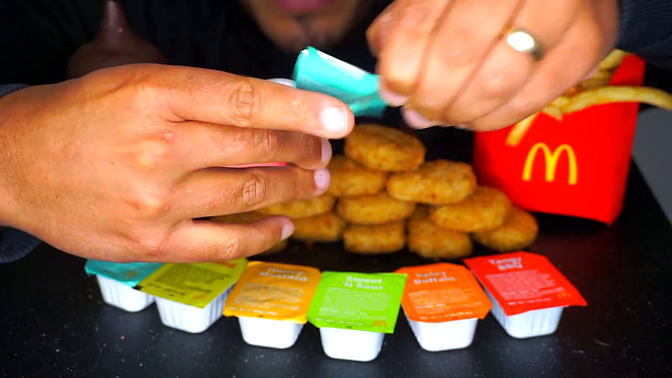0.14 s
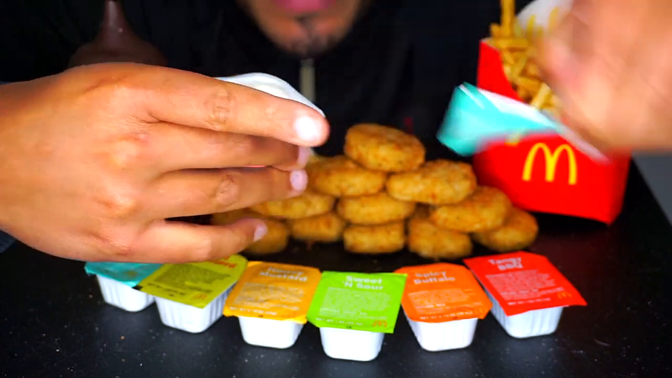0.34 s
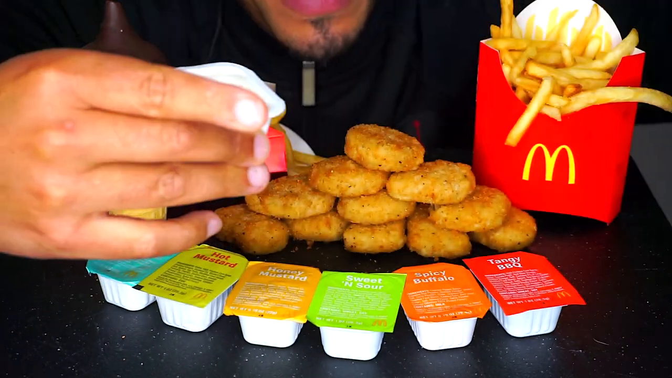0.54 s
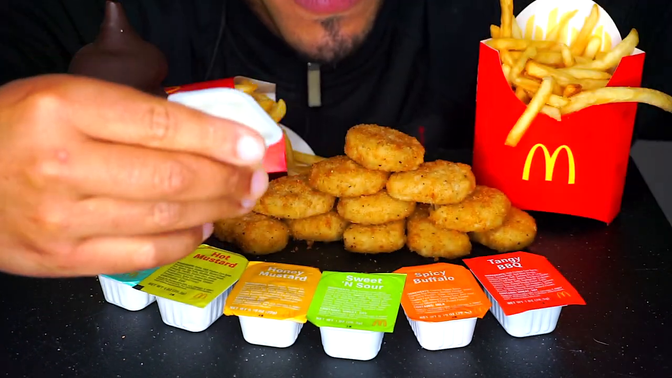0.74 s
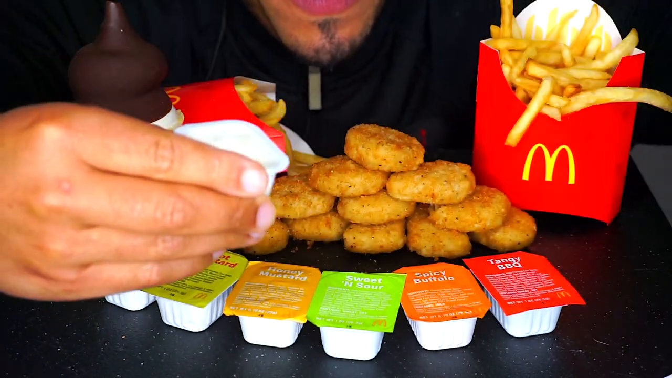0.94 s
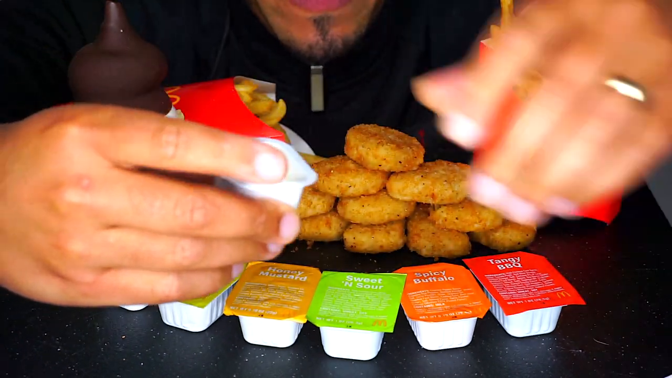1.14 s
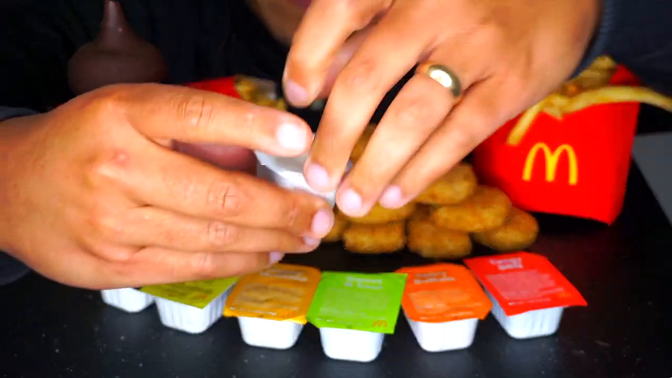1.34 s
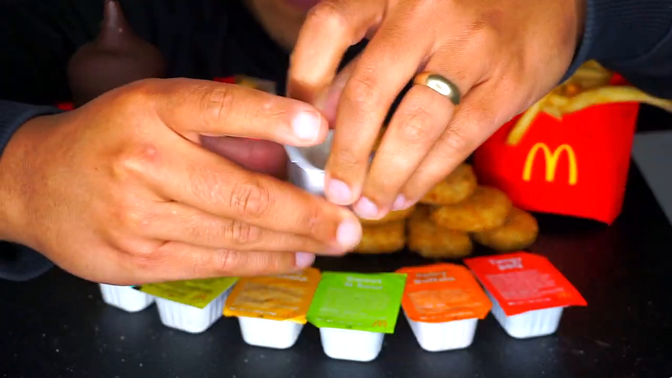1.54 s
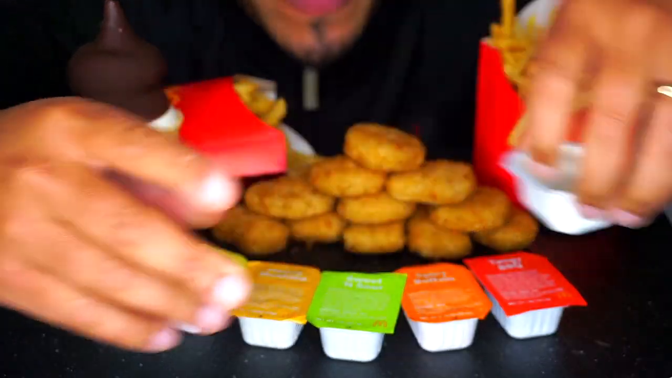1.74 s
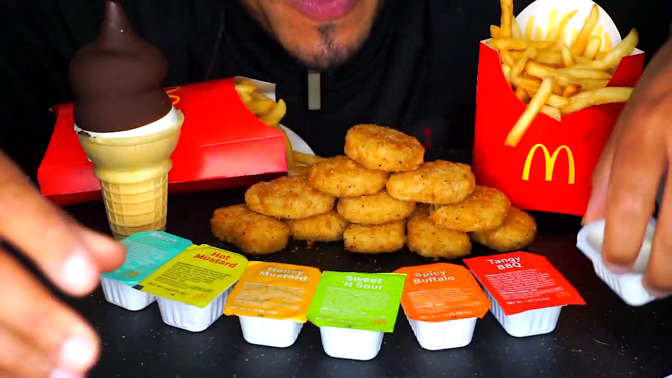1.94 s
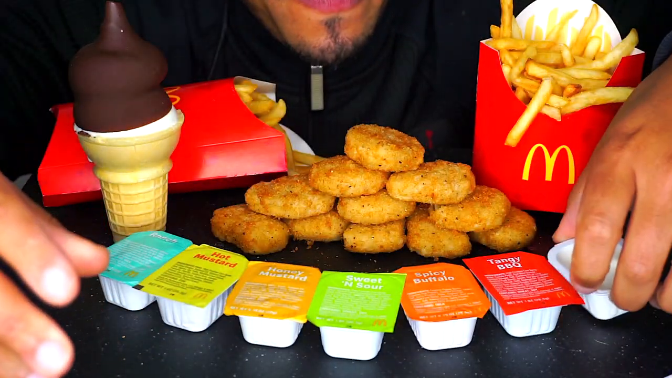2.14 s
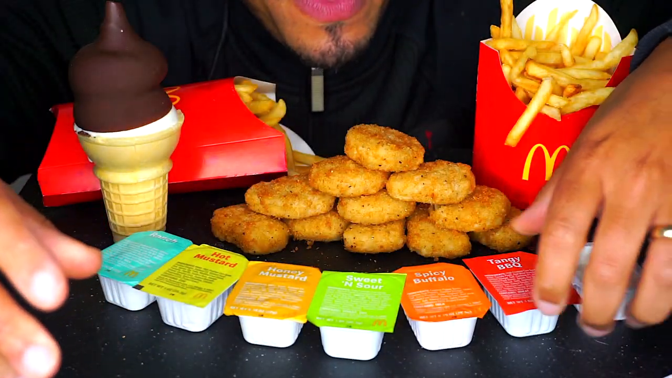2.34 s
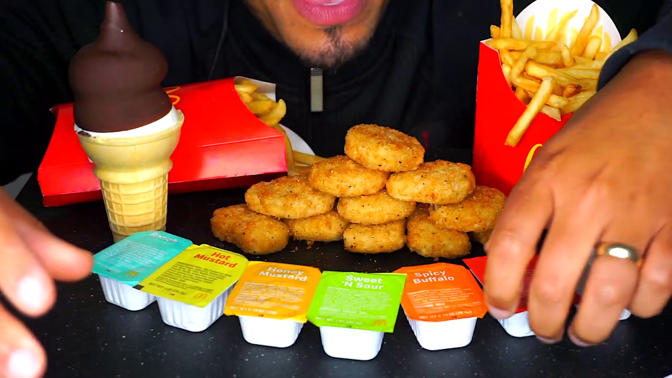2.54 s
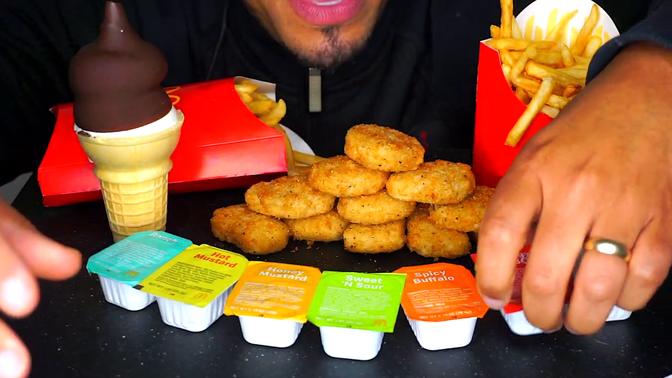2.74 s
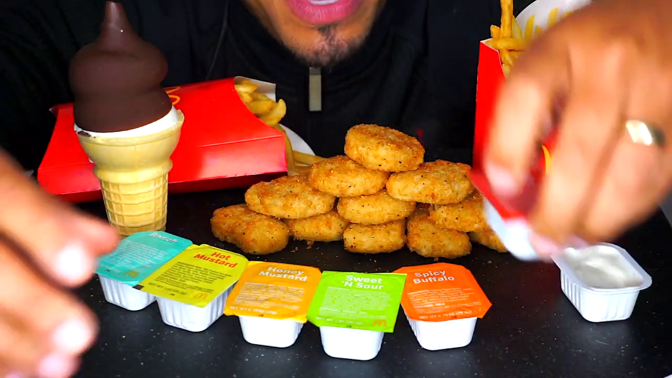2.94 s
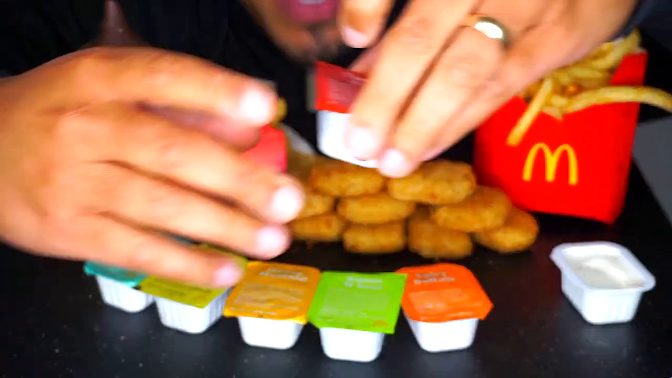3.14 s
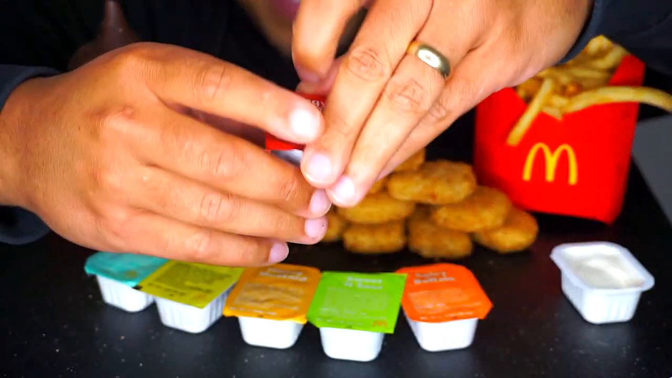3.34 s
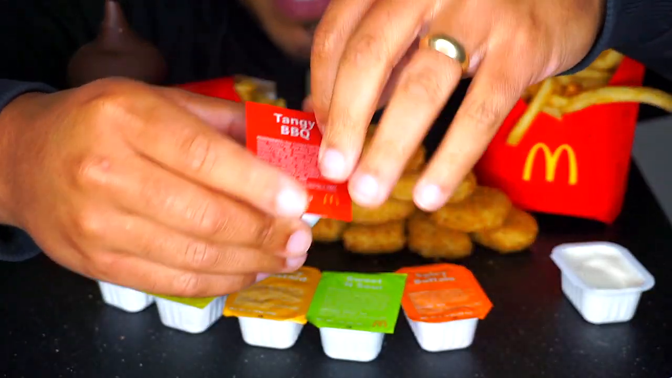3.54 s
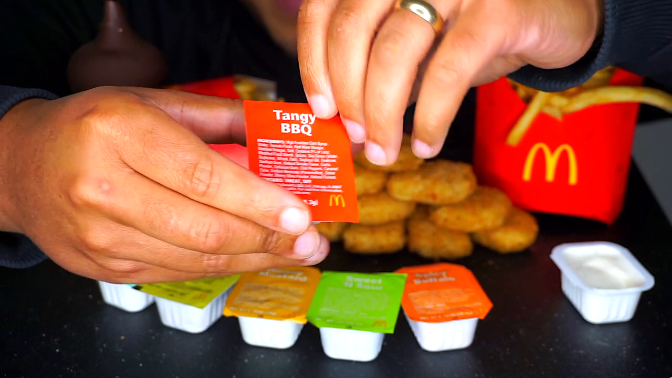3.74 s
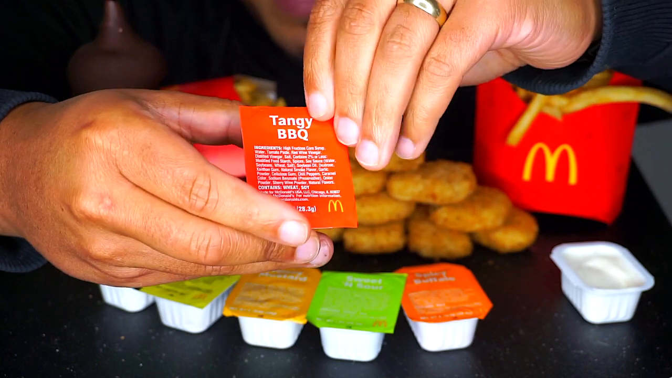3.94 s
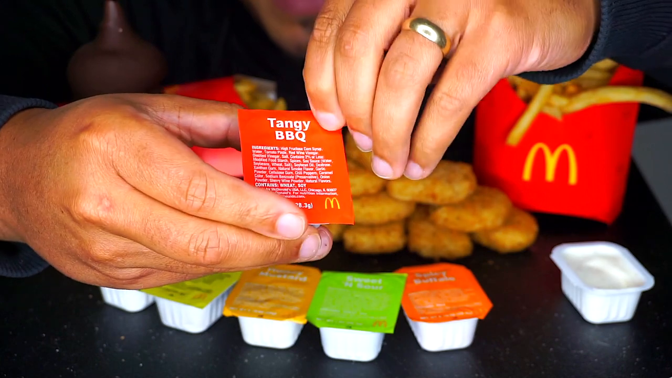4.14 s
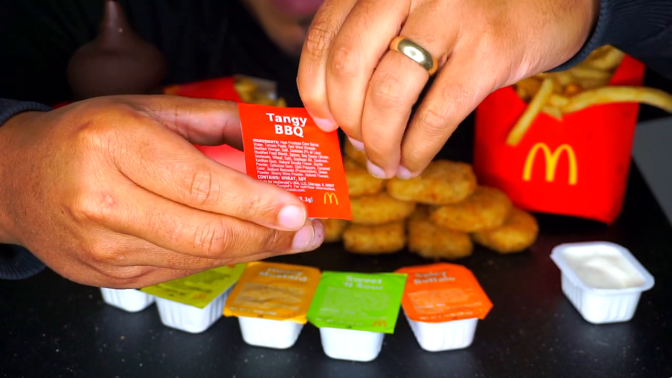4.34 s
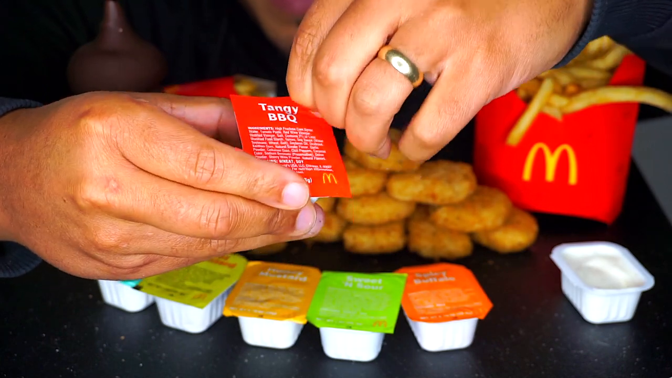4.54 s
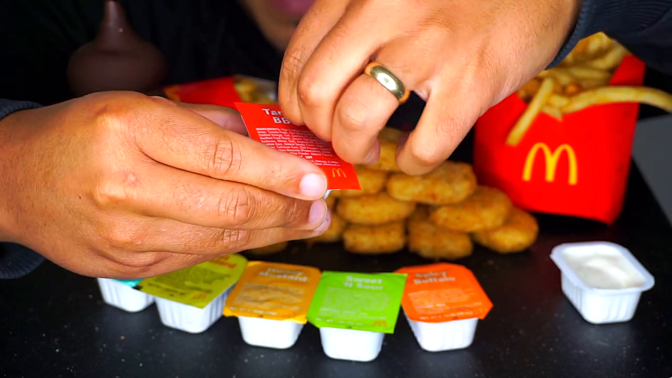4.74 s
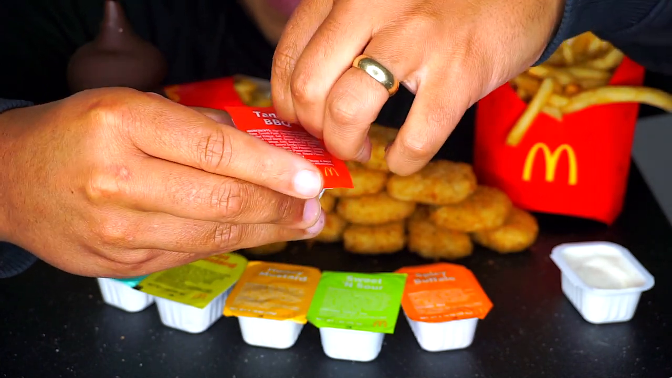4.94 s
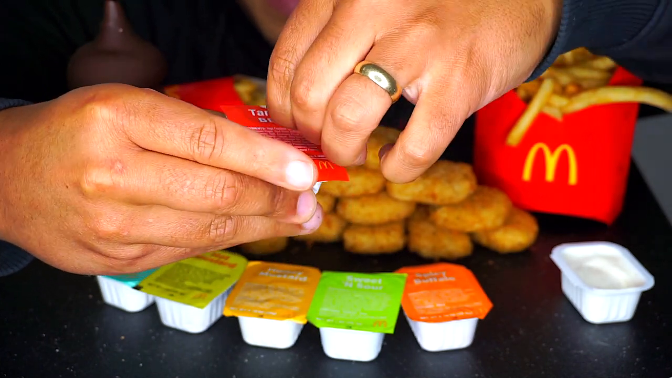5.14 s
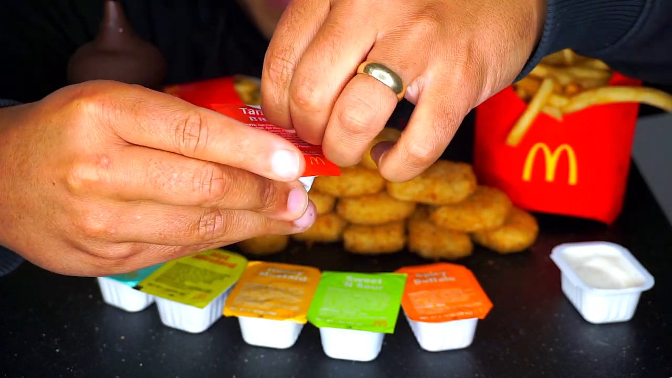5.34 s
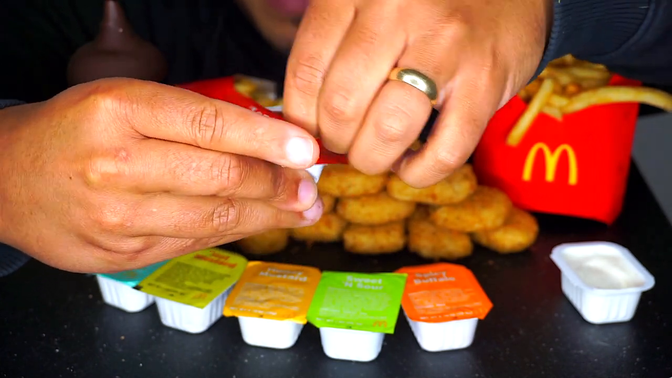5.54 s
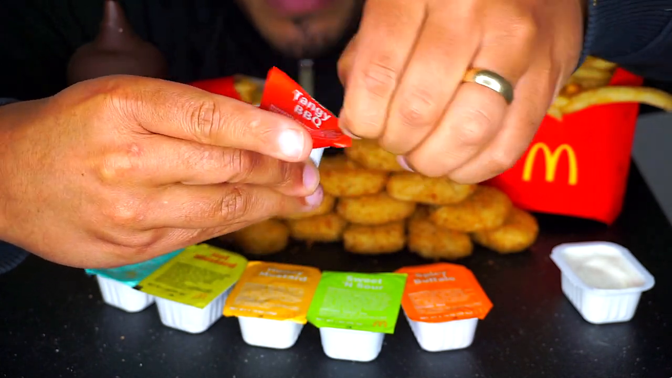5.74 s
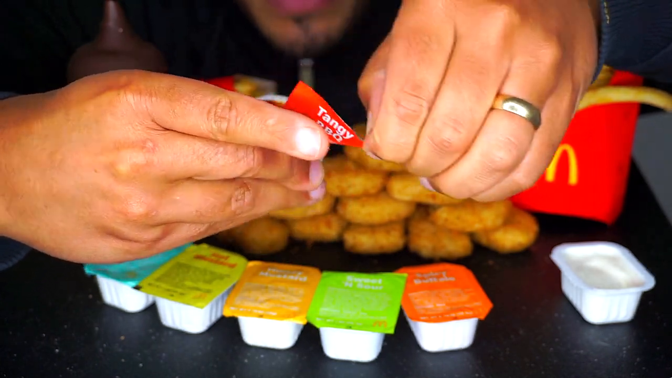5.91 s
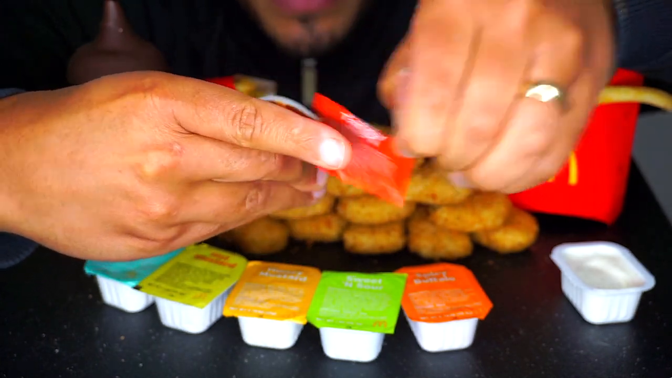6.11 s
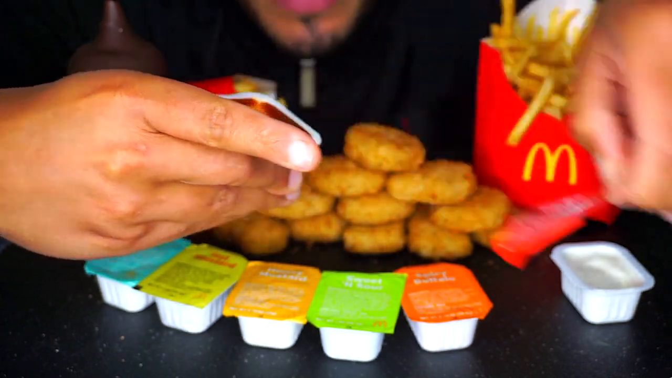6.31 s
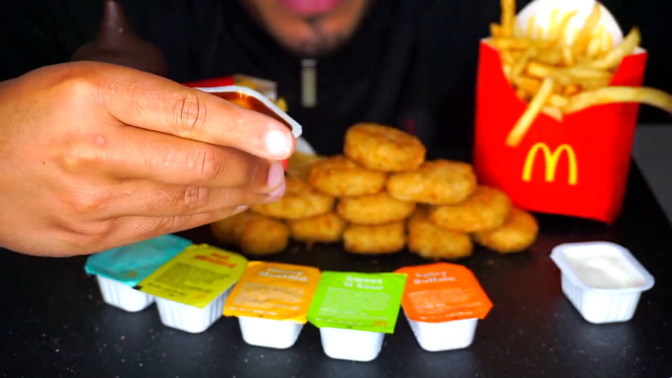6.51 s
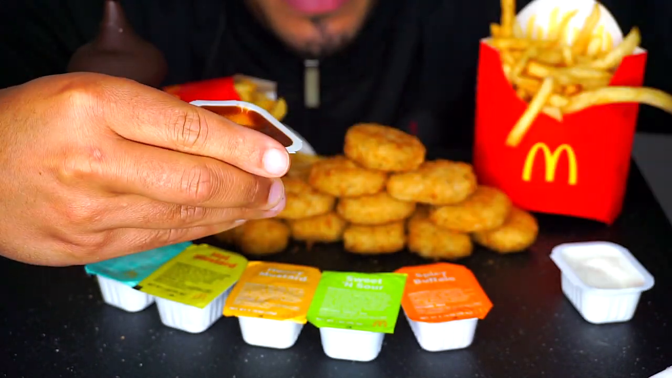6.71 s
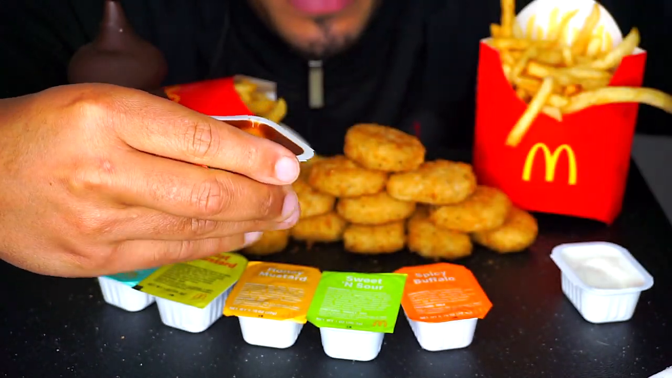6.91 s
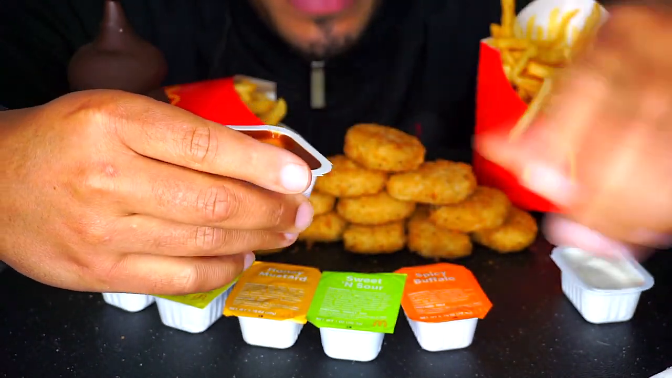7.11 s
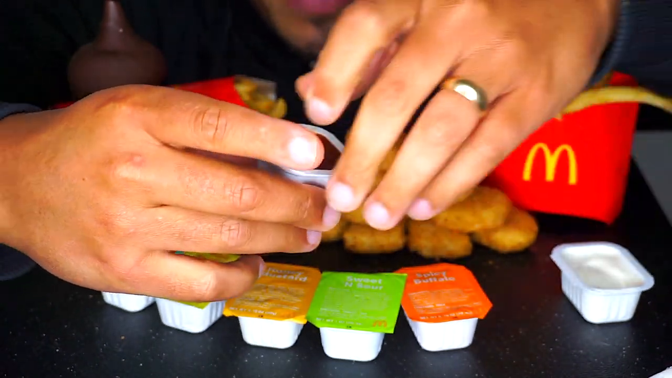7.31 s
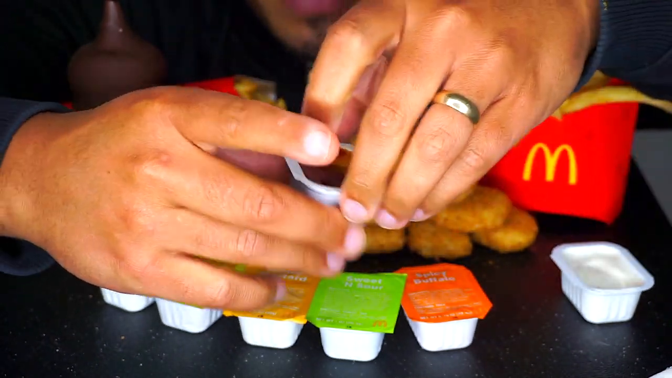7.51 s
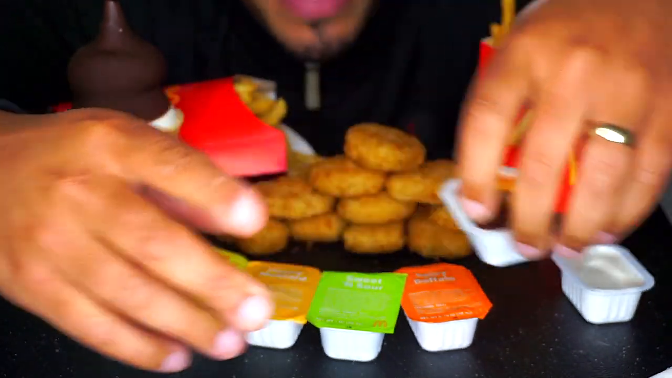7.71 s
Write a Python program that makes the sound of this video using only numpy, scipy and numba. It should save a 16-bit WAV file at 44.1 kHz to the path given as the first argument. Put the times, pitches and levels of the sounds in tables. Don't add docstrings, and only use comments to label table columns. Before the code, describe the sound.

Close to a camera microphone in a small room, steady hiss carries a thin high whine, rapid ticking and dull faint pulses. From 0 to 0.25 seconds foil crackles and scrapes off a plastic cup; brief snaps and rustles return at 0.6 and around 0.8-0.9. It quiets, with a tiny touch at 1.8, then at 2.25 the filled cup lands on the table with a hollow plastic clack and a quick rocking rattle. Faint finger rustles follow. At 3.5 comes a crisp crackle, then light picking until a short scrape at 4.75. Loud foil cracks burst at 5.05-5.1, squeaky slips at 5.2-5.3, then dense, harsh tearing from 5.4 to 5.75, bright and slightly overloaded. Sharp crackles continue at 5.85, 5.95 and 6.1-6.17. Small plastic taps and soft rustling at 6.45-6.75 fade into hiss until nearly 8.

```python
import sys
import numpy as np
from scipy import signal
from scipy.fft import rfft, irfft, next_fast_len
from scipy.io import wavfile
from scipy.ndimage import uniform_filter1d
from numba import njit

SR = 44100
rng = np.random.default_rng(int(sys.argv[2]) if len(sys.argv) > 2 else 0)


def decibels_to_gain(level_db):
    exponent = np.asarray(level_db, float) / 20
    return 10 ** exponent


def int16_out(signal):
    q = np.round(np.clip(np.atleast_2d(signal).T, -1, 1) * 32767)
    wavfile.write(sys.argv[1], SR, q.astype(np.int16))


N = 342657

# time in seconds, hiss floor in dB, left minus right in dB.
GAIN = [(0.0, -43, -1), (0.3, -50.5, 0.5), (0.8, -45.5, -1.5), (1.08, -47.5, 0), (1.64, -52.5, -1),
        (2.25, -52, -2.5), (2.42, -47, 0), (2.7, -50, -1), (3.4, -50, -1), (3.85, -47.5, -0.6),
        (4.8, -50.5, 0), (5.28, -51.5, -1), (5.5, -64.5, -0.5), (5.91, -51.5, 0.0), (7.01, -52.5, -0.5),
        (7.77, -56.5, -1)]
# frequency in Hz, density in dB per Hz.
HISS = [(24, -74.5), (40, -37), (161, -11.5), (330, -12.5), (401, -7), (450, -12.5), (522, -18), (632, -9),
        (679, -10), (823, -16), (1330, -20), (1430, -16.5), (1910, -20), (2150, -20), (12400, -22),
        (16100, -38.5), (22000, -120)]
# frequency in Hz, side minus mid in dB.
HISS_SIDE = [(60, 4), (110, -9), (200, -4), (380, -0.5), (700, 2), (1290, 4.5), (2380, 2.5), (4400, -0.5),
             (8120, -2.5), (15000, 4.5)]
# centre in Hz, width in Hz, level in dB.
WHINE = [(13030, 450, -2.5), (14600, 900, -9.5), (15600, 500, -2.5)]
# frequency in Hz, side minus mid in dB.
ROOM_SIDE = [(110, -14.5), (700, -15), (1300, -11), (2400, -11.5), (4400, -4.5), (6200, -3), (8000, -9),
             (15000, -13.5)]
# start in seconds, peak in dB, wall ring against thud in dB, ring time factor.
KNOCKS = [
    (1.8179, -40.5, -10, 0.13),
    (2.2405, -18, 6, 0.35),
    (2.257, -19, -4, 0.32),
    (2.276, -21.5, 1.5, 0.31),
    (2.302, -38, 4, 0.4),
]
# frequency in Hz, level in dB, T60 in seconds.
THUD_MODES = [(210, -6.5, 0.073), (292, 2, 0.048), (388, 1, 0.14), (536, -9, 0.11), (685, 0.5, 0.065),
              (867, -1.5, 0.026)]
# frequency in Hz, level in dB, T60 in seconds.
WALL_MODES = [(2080, -31, .05), (2300, -4, 0.13), (2450, -14, .05), (2650, -6.5, 0.044), (3480, -13, 0.042)]
# start in seconds, swell in seconds, peak in dB, pitch in Hz, T60 in seconds.
WALL_NOTES = [(1.8175, 0.001, -33.5, 900, 0.032), (1.8172, 0.00093, -33.5, 2300, 0.014),
              (2.32, 0.018, -31.5, 2300, 0.1), (2.372, .022, -36, 2300, .04),
              (2.2395, .002, -23, 690, 0.056), (5.201, .003, -10, 1990, .03),
              (5.21, .003, -14, 2130, 0.035), (5.2455, .003, -6, 2280, 0.04),
              (5.273, 0.0055, -9.5, 2393, 0.055), (5.299, .002, -14.5, 2300, 0.022),
              (5.321, .004, -14, 2580, 0.025), (5.418, 0.003, -10, 2650, .03),
              (6.538, .001, -25.5, 4100, 0.015), (6.538, 0.0011, -23, 1970, 0.015),
              (6.538, 0.0012, -23, 3020, 0.017), (6.6599, 0.0016, -27, 1590, 0.016),
              (6.7022, .001, -24, 2850, 0.02), (5.647, 0.0054, -6.5, 2060, .05),
              (5.612, 0.0046, -5, 2050, 0.074), (5.708, .005, -10, 2300, 0.035),
              (2.2405, 0.00092, -29, 3600, 0.022), (2.241, 0.0031, -23, 2050, 0.065),
              (2.258, 0.0018, -33, 3500, 0.027), (.7826, 0.002, -11, 2930, 0.03),
              (.7822, 0.0021, -13, 1640, 0.025), (5.254, .002, -19, 3500, .03),
              (5.31, .003, -23.5, 2300, .03), (5.289, .001, -17.5, 3100, 0.014),
              (3.472, .014, -23, 2080, .09), (3.4945, .002, -28, 1350, .025), (5.497, .002, 1, 2150, .018),
              (5.5165, .0015, 0, 2000, .016), (5.602, .002, -3, 2100, .025), (5.648, .002, 1, 2250, .016),
              (5.759, .003, -8, 2100, .03), (.8632, .001, -13, 5000, .025), (.7835, .001, -14, 2200, .03)]
# start in seconds, peak in dB, centre in Hz.
FIBRE_TICKS = [(.0107, -19, 9000), (.0586, -14.5, 8000), (.133, -9, 14000), (0.161, -15, 12500),
               (.174, -11, 10500), (.5812, -28, 12000), (0.6056, -16.5, 9500), (0.834, -18, 8500),
               (0.85, -11.5, 10000), (0.8727, -12, 10000), (0.9107, -15, 9000), (0.9174, -15, 5200),
               (2.4473, -29.5, 12000), (2.4627, -34, 12000), (2.539, -31, 12000), (3.0472, -35, 11000),
               (3.533, -8, 11500), (4.063, -30, 10500), (4.1812, -33, 12000), (4.4024, -29.5, 13000),
               (4.5965, -29, 12000), (4.7284, -31, 11000), (4.74, -22, 13000), (5.0479, -15, 12500),
               (5.054, -13.5, 10500), (5.0556, -17, 10500), (5.0613, -4, 11000), (5.0748, -1.5, 11500),
               (5.0758, -4, 11000), (5.0965, -2.5, 10000), (5.1613, -14, 9000), (5.1866, -13, 9500),
               (5.249, -8, 7500), (5.26, -13, 10500), (5.2908, -10, 8000), (5.5496, -5, 9500),
               (5.571, -5, 12000), (5.581, -3.5, 12000), (5.811, -8, 11500), (5.844, -1.5, 10500),
               (5.9285, -14, 12000), (5.9345, -15, 12000), (5.942, -4, 12500), (5.957, -2, 12500),
               (5.963, 0, 12500), (5.979, -9, 12500), (5.9842, -12.5, 11500), (6.0832, -11.5, 11500),
               (6.0876, -13.5, 10500), (6.105, -11, 10500), (6.1286, -10, 10500), (6.675, -20.5, 12500),
               (6.7268, -23, 8000)]
# start in seconds, peak in dB, foil against cup crack in dB, ring in Hz.
PICK_SNAPS = [(0.0572, -18, -2, 2480), (0.117, -7.5, 10.5, 2730), (.1314, -15, 6, 2910),
              (0.1569, -9.5, 14, 3000), (.1734, -18, 1, 1970), (.5691, -30, 11, 4190), (.605, -27, 1, 2040),
              (0.7826, -11, -3, 2600), (0.85, -18, 2, 2310), (0.8662, -15, -3, 5600),
              (0.917, -31.5, 15, 4930), (2.6246, -34, -4, 2300), (2.8489, -32, 20, 2120),
              (2.949, -29, 1, 2700), (3.5314, -13, 9, 2030), (3.6115, -32, -11, 2300),
              (3.7274, -30, -10.5, 2540), (3.8066, -30, -1, 2680), (3.846, -27, -4, 2650),
              (3.87, -22.5, -3, 6200), (4.076, -29, -5, 2220), (4.313, -29.5, 3, 2400),
              (4.3997, -29.5, 3, 1460), (4.5061, -31, 6, 1390), (5.031, -24.5, 26, 1750),
              (5.035, -15, 23, 1600), (5.0434, -18.5, 21, 1640), (3.508, -27, -6, 2050),
              (6.441, -26.5, -6, 3060)]
PEEL_SNAPS = [(5.059, 0, 18, 1560), (5.0724, 1, -3.5, 1900), (5.0935, 2.5, -1.5, 1660),
              (5.203, -17, -14, 2000), (5.2455, -5, 3, 1900), (5.289, -13, -4.5, 2260),
              (5.4151, -4, 1, 2650), (5.499, 1, -9, 2120), (5.5166, 1.5, -4.5, 2140),
              (5.5713, -5.5, -7, 2320), (5.5795, -7, -2, 2250), (5.5985, 4.5, 5.5, 2104),
              (5.622, 5, -2, 2150), (5.8105, -16.5, -6.5, 2000), (5.8416, -2, 5, 2280),
              (5.9224, -15, 9.5, 2320), (5.9326, -16, 3.5, 2450), (5.9415, -13, 6, 2370),
              (5.956, -9.5, 3, 2290), (5.9624, -9.5, 2.5, 2270), (5.978, -17, 3, 2130),
              (6.083, -13.5, 1, 2315), (6.104, -17.5, -1, 2500), (6.117, -6.5, 6.5, 2220),
              (6.538, -24.5, -15.5, 3140), (6.5875, -27, -6, 2090), (6.6214, -26.5, -14, 2140),
              (6.6605, -22, -23, 1730), (6.684, -27, -0.2, 4970), (6.7025, -19, -7, 2820),
              (5.549, -14, 6.5, 2300), (5.562, -15, 4, 2200), (5.588, -7, 6, 2210), (5.462, 1, -4.5, 2080),
              (5.48, 1.5, 1.5, 2300), (5.432, 2.5, 3, 2630), (6.548, -27.5, -10, 5050)]
# time in seconds, level in dB.
FINGERS = [(0, -46.5), (.5, -54.5), (1.1, -53.5), (1.6, -61), (2.2, -73.5), (2.45, -62), (2.8, -66.5),
           (3.0, -48.5), (3.22, -68.5), (3.36, -54.5), (3.7, -52), (4.05, -48.5), (4.2, -57.5),
           (4.45, -58.5), (4.72, -59), (6.85, -53), (7.3, -72.5), (7.77, -66)]
# start in seconds, hold in seconds, level in dB, cup resonance in Hz,
# grip (wall note against broad rustle) in dB.
CUP_STROKES = [(0, .11, -27.5, 2160, -6), (0.182, .06, -30.5, 2450, -6), (0.606, .02, -31.5, 2180, -4.5),
               (0.782, .006, -28.5, 2180, -8), (0.792, 0.05, -32, 2100, -9), (1.82, .005, -49.5, 880, 11),
               (2.243, 0.013, -31, 2250, 2.5), (2.322, .03, -43.5, 2280, 4), (2.628, .01, -47.5, 2130, -8),
               (3.48, 0.017, -38, 2100, 6), (4.752, .06, -28.5, 2300, -2.5),
               (5.072, 0.024, -18.5, 1672, -6.5), (5.11, .04, -31, 4000, -3), (5.2, .016, -23, 1950, 9),
               (5.25, 0.0083, -20, 2400, 4), (5.262, 0.065, -22, 2300, 0), (5.419, 0.032, -12, 2650, 3.5),
               (5.4, .008, -24, 2340, 2.5), (5.555, .025, -25.5, 2350, -6), (5.601, 0.15, -13, 2150, -4),
               (5.784, .03, -27.5, 2210, -5), (5.943, .035, -26, 2300, -4), (6.094, .015, -33, 2340, -4.5),
               (6.147, 0.018, -17.5, 2300, -10.5), (6.44, .005, -45.5, 2160, 3), (6.54, .02, -41, 2300, -8)]
MORE_CUP_STROKES = [(6.59, .06, -40, 2500, -8), (6.445, .03, -46, 3100, 0), (6.665, 0.04, -42, 2700, -8),
                    (5.845, .01, -29.5, 2700, -8), (6.128, .015, -24, 2140, 2), (4.741, .01, -34, 2600, -11.5),
                    (4.84, .05, -37.5, 3300, -10.5), (3.49, .01, -34.5, 2160, -11), (5.222, .02, -30, 2100, 1.5),
                    (5.46, 0.038, -11.5, 2420, -2.5), (0.67, 0.062, -44.5, 3900, -13),
                    (3.3, 0.0084, -52.5, 2000, -12)]
# start in seconds, rise in seconds, hold in seconds, level in dB,
# foil hiss against sheet rustle in dB.
LID_STROKES = [(0, .01, 0.12, -34, -2), (0.188, 0.045, 0.036, -25.5, -0.5), (0.605, 0.03, 0.035, -34, -6.5),
               (0.787, .005, 0.045, -38, -3), (0.862, .01, 0.048, -28.5, -9.5), (2.24, .005, .01, -50, 7),
               (2.923, .06, 0.031, -52.5, 4), (3.48, 0.008, 0.0098, -34, 3), (3.869, 0.011, 0.025, -44, 9),
               (3.938, .03, 0.023, -49, 9.5), (4.751, 0.024, 0.028, -30.5, 0.5),
               (5.031, 0.005, 0.012, -53.5, 20), (5.072, 0.008, 0.023, -25, 0), (5.1, .01, .03, -50, 12),
               (5.054, .003, .015, -45, 19), (5.186, .006, 0.018, -26, -3),
               (5.418, 0.0071, 0.075, -14.5, 2.5), (5.503, .01, 0.059, -21, -4.5),
               (5.598, .003, 0.051, -15, 2), (5.681, 0.03, 0.072, -18, 7), (5.794, 0.011, 0.025, -34, -4),
               (5.937, 0.05, 0.04, -32.5, -2), (6.088, 0.0054, 0.01, -33, -1),
               (6.146, 0.038, 0.014, -19.5, 0), (6.44, .004, 0.0082, -43, -5),
               (6.684, 0.087, 0.05, -42, -3)]
MORE_LID_STROKES = [(6.54, .004, 0.12, -44.5, -16), (5.25, .004, 0.045, -33, -1), (6.95, .01, .01, -49.5, -4),
                    (5.845, .004, 0.0075, -27, -4.5), (0.69, .03, 0.043, -39, -4), (.57, .004, .03, -50, 6),
                    (4.4, .004, .08, -59.5, 11), (3.33, .02, .03, -56.5, 2)]
# start in seconds, hold in seconds, level in dB.
RIM_STROKES = [(4.748, 0.055, -29), (4.86, 0.1, -56), (.784, 0.05, -33), (5.247, .075, -28),
               (4.3, 0.22, -54.5), (5.08, .07, -25.5), (5.42, .04, -22), (5.6, .15, -21), (5.8, .1, -41)]
# start in seconds, rise in seconds, hold in seconds,
# level in dB, band centre in Hz.
FLAP_STROKES = [(.19, .04, .04, -31, 8600), (0.605, .02, 0.022, -40, 9200), (.59, .015, .02, -44, 15000),
                (0.859, .01, 0.052, -30, 4800), (.26, .03, .04, -40, 4800), (3.867, .008, 0.017, -46, 6400),
                (4.74, .01, 0.027, -34, 13500), (4.803, .03, 0.044, -44, 7600),
                (5.031, .004, .012, -37, 9500), (5.067, .006, .004, -28, 7800),
                (5.419, .005, 0.06, -19.5, 3300), (5.509, .01, 0.048, -23.5, 4900),
                (5.597, .003, .06, -17, 11800), (5.68, .02, .06, -19, 10800), (6.135, .02, .03, -25, 11500),
                (6.69, .06, 0.063, -40, 4200), (6.65, .02, .02, -47, 13500),
                (3.473, .008, 0.014, -38, 11500)]
# frequency in Hz, level in dB.
FOIL = [(4000, -30.5), (7000, -19.5), (8600, -6), (10400, 1.5), (11800, -.5), (13100, 2.5), (14500, 1.5),
        (17000, -2)]

CONTROL_STEP = 16
CUP_RISE_S, RISE_DB = 0.011, 28.5
CUP_FADE_DB_S, LID_FADE_DB_S = 160, 166.5
STEADY_S = 0.053
RIM_HZ = 1480
SMALL_HZ, WALL_TOP_HZ = 1350, 4550


def level(x, db=0):
    return x * decibels_to_gain(db) / np.sqrt(np.mean(x ** 2))


def curve(table):
    s, *columns = np.transpose(table)
    return [np.interp(np.arange(N) / SR, s, c) for c in columns]


def to_samples(control):
    return np.interp(np.arange(N), np.arange(0, N, CONTROL_STEP), control)


@njit
def svf(x, hz, width):
    y, b, l = np.empty(len(x)), 0., 0.
    for i in range(len(x)):
        g, k = np.tan(np.pi * hz[i] / SR), width / hz[i]
        v = (b + g * (x[i] - l)) / (1 + g * (g + k))
        b, l, y[i] = 2 * v - b, l + 2 * g * v, k * v
    return y


def band(x, hz, width_hz):
    hz = np.clip(hz + np.zeros(len(x)), 50, 18000)
    return svf(svf(x, hz, 1. * width_hz), hz, 1. * width_hz)


def butter(x, order, hz, kind):
    return signal.sosfilt(signal.butter(order, hz, kind, fs=SR, output="sos"), x)


def colour(x, table):
    hz, db = np.transpose(table)
    size = next_fast_len(len(x))
    f = np.fft.rfftfreq(size, 1 / SR) + 1
    return irfft(rfft(x, size) * decibels_to_gain(np.interp(np.log(f), np.log(hz), db)), size)[:len(x)]


def decay(t, t60):
    return np.exp(-np.log(1000) * t / t60)


def ring(hz, t60, seconds):
    t = np.arange(int(seconds * SR)) / SR
    return np.sin(2 * np.pi * hz * t) * decay(t, t60)


def add(out, s, sound, peak_db):
    i = int(s * SR)
    sound = sound * decibels_to_gain(peak_db) / np.abs(sound).max()
    out[i:i + len(sound)] += sound[:len(out) - i]


def camera(floor_db):
    t = np.arange(N) / SR
    field_hz, tick_s, thump_s = 59.94, .0101, .0285
    mid, side = (colour(rng.standard_normal(N), HISS) for _ in range(2))
    unit = np.std(band(mid, 450, 1100))
    mid, side = mid / unit, colour(side, HISS_SIDE) / unit
    field_phase = ((t - tick_s) * field_hz + .5) % 1 - .5
    tick = np.exp(-field_phase ** 2 / (.0008 * field_hz) ** 2)
    frame_phase = (t - thump_s) * field_hz / 2 % 1
    push = np.exp(-frame_phase / (.003 * field_hz / 2)) * rng.standard_normal(N)
    housing = level(band(push, 520, 650)) + level(band(push, 800, 1600), -3)
    mid = mid + level(housing, -1.5)
    out = []
    for hiss in (mid + side, mid - side):
        noise = rng.standard_normal(N)
        whine = sum(level(band(noise, hz, width_hz), db) for hz, width_hz, db in WHINE)
        whine = whine + level(band(noise, 14500, 4000), 3)
        out.append(hiss + level(whine * (1 + 2.6 * tick), 7.6))
    return decibels_to_gain(floor_db - 4.5) * np.array(out)


def room(x):
    t60_s, treble_t60_s, direct_share = 0.61, 0.34, 0.7
    t = np.arange(int(.7 * SR)) / SR
    split = signal.butter(1, 3500, fs=SR)
    mid, side = rng.standard_normal((2, len(t)))
    side = colour(side, ROOM_SIDE) * decibels_to_gain(9.0)
    out = []
    for noise in (mid + side, mid - side):
        low = signal.lfilter(*split, noise)
        tail = low * decay(t, t60_s) / np.sqrt(t60_s)
        tail = tail + (noise - low) * decay(t, treble_t60_s) / np.sqrt(treble_t60_s)
        tail = tail * np.sqrt((1 - direct_share) * 2 * np.log(1000) / SR)
        out.append(np.sqrt(direct_share) * x + signal.fftconvolve(x, tail)[:N])
    return np.array(out)


def knocks():
    out = np.zeros(N)
    strengths = decibels_to_gain(1.7 * rng.standard_normal((len(KNOCKS), len(THUD_MODES))))
    for (s, peak_db, wall_db, stay), strength in zip(KNOCKS, strengths):
        thud = sum(g * decibels_to_gain(db) * ring(hz, t60, .3) for (hz, db, t60), g in zip(THUD_MODES, strength))
        wall = sum(decibels_to_gain(db + wall_db) * ring(hz, t60 * stay, .3) for hz, db, t60 in WALL_MODES)
        thud = thud * np.minimum(np.arange(len(thud)) / SR / 0.0018, 1)
        add(out, s, thud + wall, peak_db)
    return out


def wall_notes():
    out = np.zeros(N)
    waver = rng.standard_normal((len(WALL_NOTES), 8000))
    t = np.arange(8000) / SR
    for (s, swell, peak_db, hz, t60), w in zip(WALL_NOTES, waver):
        shape = np.minimum(t / swell, 1) * decay(np.maximum(t - swell, 0), t60)
        gain = decibels_to_gain(peak_db + 1.6 * level(uniform_filter1d(w, size=120)))
        note = gain * shape * np.sin(2 * np.pi * hz * t)
        i = int(s * SR)
        out[i:i + len(note)] += note[:N - i]
    return out


def fibre_ticks():
    out = np.zeros(N)
    t60_s, length_s = .0011, .01
    for s, peak_db, hz in FIBRE_TICKS:
        sound = ring(hz, t60_s, length_s)
        sound = sound + .6 * ring(0.79 * hz, t60_s, length_s) - 0.66 * ring(1.1 * hz, t60_s, length_s)
        add(out, s, sound, peak_db)
    return out


def snaps():
    out = np.zeros(N)
    rows = PICK_SNAPS + PEEL_SNAPS
    cracks = rng.standard_normal((len(rows), 900))
    t = np.arange(900) / SR
    short, long = (np.minimum(t / 0.00011, 1) * np.exp(-(t / s) ** 2 / 2) for s in (.0013, .0024))
    for (s, peak_db, foil_db, hz), crack in zip(rows, cracks):
        wall = level(band(crack * long, hz, 860)) + level(band(crack * long, 2550, 2100), -1.1)
        bright = band(band(crack * short, 11800, 11000), 11800, 11000)
        add(out, s, level(wall) + level(bright, foil_db), peak_db)
    return out


def slips(per_s, spread_db, patchy_db):
    hit = rng.random(N) < per_s / SR
    size = np.minimum(decibels_to_gain(spread_db * rng.exponential(size=N)), 5) * np.sign(rng.standard_normal(N))
    flurry = level(uniform_filter1d(uniform_filter1d(rng.standard_normal(N), size=130), size=130))
    return hit * size * decibels_to_gain(patchy_db * flurry)


def stroke(s, rise, hold, db, fade_db_s):
    t = np.arange(0, N, CONTROL_STEP) / SR - s
    fall = np.maximum(t - hold, 0) * fade_db_s * (1 + hold / STEADY_S)
    return decibels_to_gain(2 * (db - fall + np.minimum(t, 0) / rise * RISE_DB))


def squeak_share(grip_db):
    return np.clip((grip_db - 2.5) / 7, 0, 1)


def cup_gestures(fingers):
    cup_p, cup_hz, grip = fingers, fingers * 1930, fingers * -11.5
    body_p = fingers * decibels_to_gain(2 * -11)
    for s, hold, db, hz, grip_db in CUP_STROKES + MORE_CUP_STROKES:
        stop = 1 + 3 * squeak_share(grip_db)
        p = stroke(s, CUP_RISE_S, hold, db, CUP_FADE_DB_S * stop)
        cup_p, cup_hz, grip = cup_p + p, cup_hz + p * hz, grip + p * grip_db
        body_p = body_p + p * decibels_to_gain(2 * (-25 - grip_db))
    for s, db, *_ in KNOCKS:
        body_p = body_p + stroke(s, CUP_RISE_S, 0, db - 26.5, CUP_FADE_DB_S)
    return [to_samples(c) for c in (cup_p, cup_hz / cup_p, grip / cup_p, body_p)]


def lid_gestures(fingers):
    sheet_p, foil_p = fingers, fingers * decibels_to_gain(2 * -7)
    for s, rise, hold, db, foil_db in LID_STROKES + MORE_LID_STROKES:
        p = stroke(s, rise, hold, db, LID_FADE_DB_S)
        sheet_p, foil_p = sheet_p + p, foil_p + p * decibels_to_gain(2 * foil_db)
    return to_samples(sheet_p), to_samples(foil_p)


def rim_rub(grit):
    power = sum(stroke(s, CUP_RISE_S, hold, db, CUP_FADE_DB_S / 2) for s, hold, db in RIM_STROKES)
    return np.sqrt(to_samples(power)) * level(band(grit, RIM_HZ, 1150))


def flap(grit):
    powers = [stroke(*row[:4], LID_FADE_DB_S) + 1e-14 for row in FLAP_STROKES]
    power = sum(powers)
    hz = sum(p * row[-1] for p, row in zip(powers, FLAP_STROKES)) / power
    return np.sqrt(to_samples(power)) * level(band(grit, to_samples(hz), 3400))


def cup_wall(grit, hz, grip):
    bend = level(uniform_filter1d(uniform_filter1d(grit, size=900), size=900))
    hz = hz * (1 + .025 * bend)
    note, rim = decibels_to_gain(grip), decibels_to_gain(-15.5 - 0.52 * grip)
    squeak = squeak_share(grip)
    tight = np.sqrt(1 - squeak) * level(band(grit, hz, 850))
    tight = tight + np.sqrt(squeak) * level(band(grit, hz, 330))
    broad = level(band(grit, 1.194 * hz, 1840))
    wall = note * tight + rim * level(band(grit, RIM_HZ, 910)) + broad
    wall = butter(wall / np.sqrt(1 + note ** 2 + rim ** 2), 4, SMALL_HZ, "high")
    return butter(wall, 4, WALL_TOP_HZ, "low")


def peel():
    fingers = decibels_to_gain(2 * curve(FINGERS)[0][::CONTROL_STEP])
    cup_p, cup_hz, grip, body_p = cup_gestures(fingers)
    sheet_p, foil_p = lid_gestures(fingers)
    grit = slips(12000., spread_db=2.4, patchy_db=2.0)
    cup = np.sqrt(cup_p) * level(cup_wall(grit, cup_hz, grip))
    body = np.sqrt(body_p) * level(band(grit, 850, 1000))
    sheet = np.sqrt(sheet_p) * level(butter(band(grit, 5100, 12000), 4, SMALL_HZ, "high"))
    foil = np.sqrt(foil_p) * level(colour(grit, FOIL))
    return flap(grit) + cup + body + sheet + foil + rim_rub(grit)


def scene():
    floor_db, pan_db = curve(GAIN)
    hits, clear = snaps() + knocks() + fibre_ticks(), wall_notes()
    near = room(peel() + 1.03 * hits + decibels_to_gain(-5.5) * clear) + 0.24 * hits + 0.53 * clear
    near = butter(near, 3, 170, "high")
    return (near + camera(floor_db)) * decibels_to_gain(np.array([pan_db, -pan_db]) / 2)


def roll_off(x):
    return signal.sosfilt(signal.butter(12, 16000, fs=SR, output="sos"), x)


def record(dry):
    clipped = np.clip(dry, -.87, .87)
    heard = signal.sosfilt(signal.ellip(10, .2, 70, 15850, fs=SR, output="sos"), clipped)
    return roll_off(heard)


dry = scene()
out = record(dry)
int16_out(out)
```